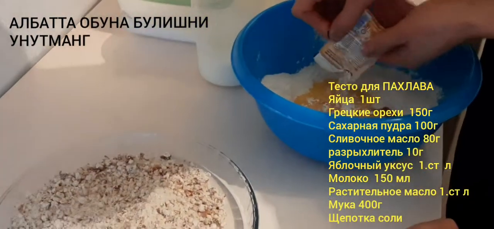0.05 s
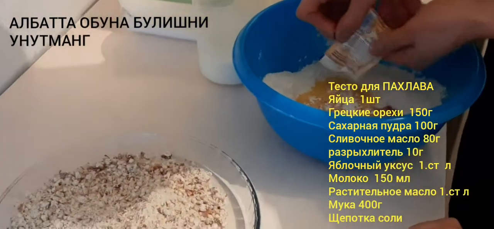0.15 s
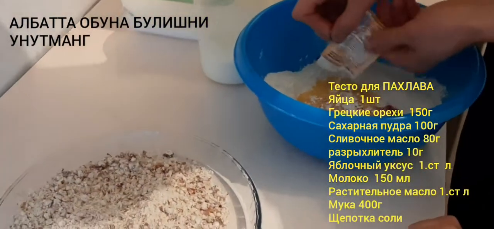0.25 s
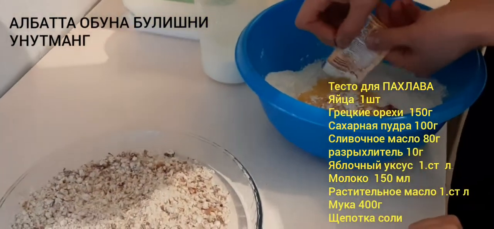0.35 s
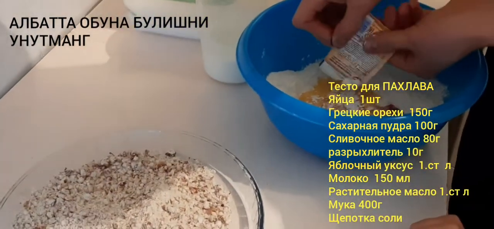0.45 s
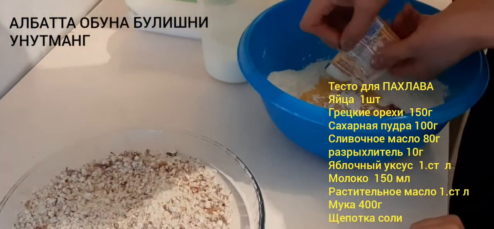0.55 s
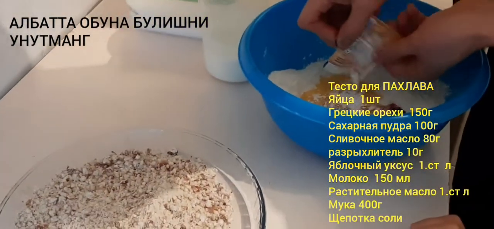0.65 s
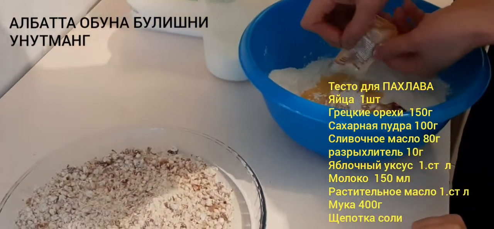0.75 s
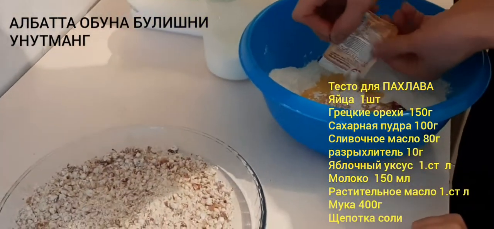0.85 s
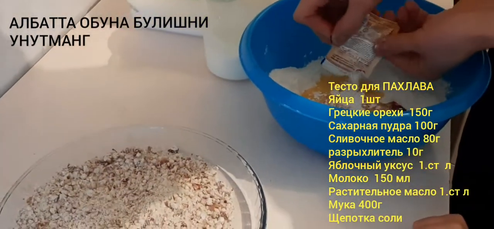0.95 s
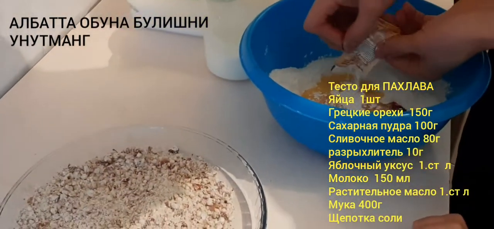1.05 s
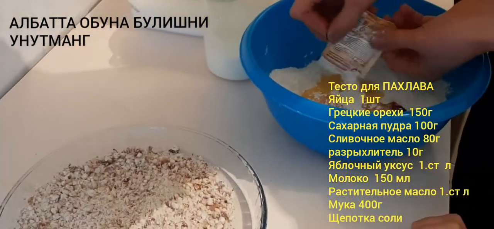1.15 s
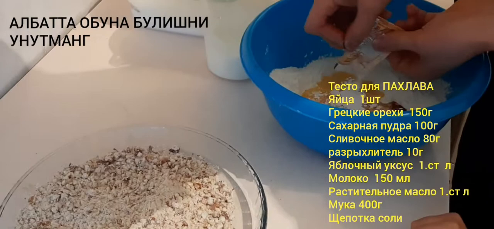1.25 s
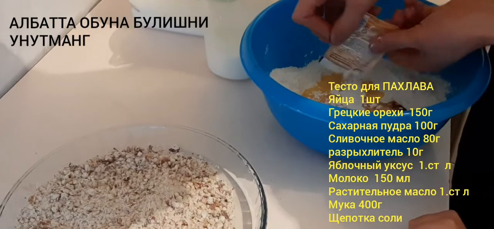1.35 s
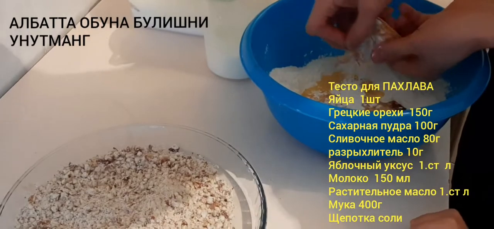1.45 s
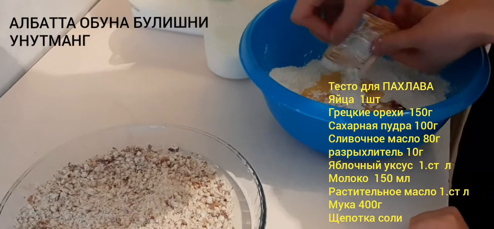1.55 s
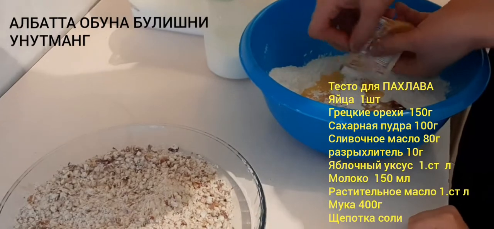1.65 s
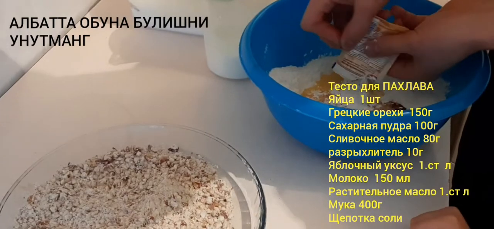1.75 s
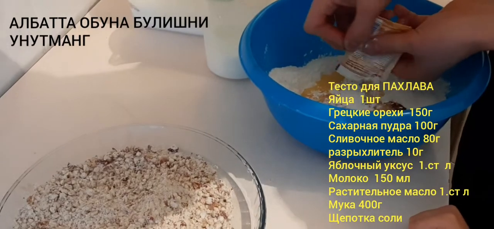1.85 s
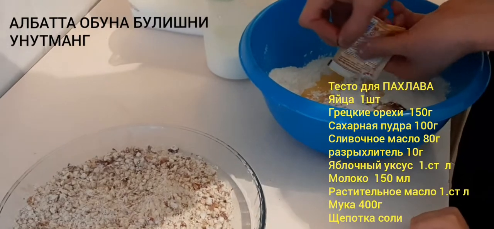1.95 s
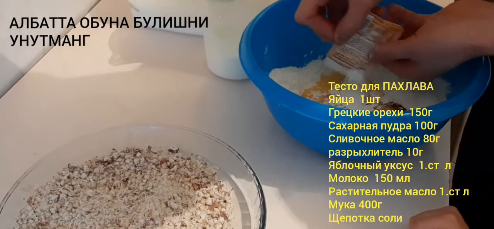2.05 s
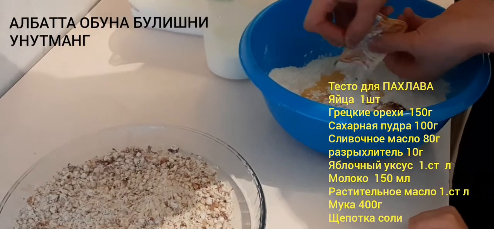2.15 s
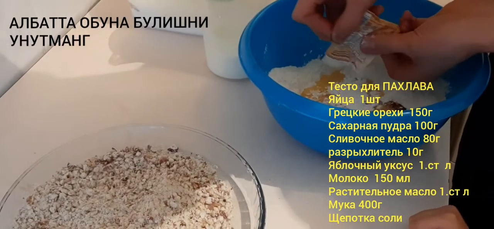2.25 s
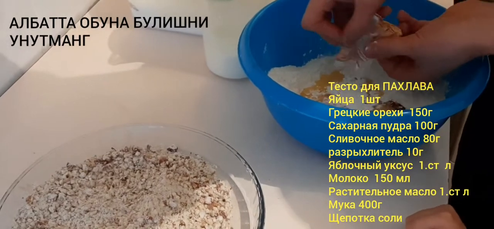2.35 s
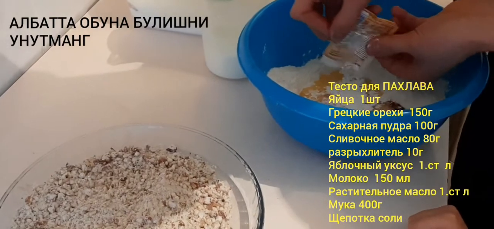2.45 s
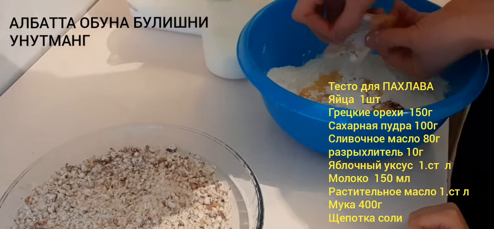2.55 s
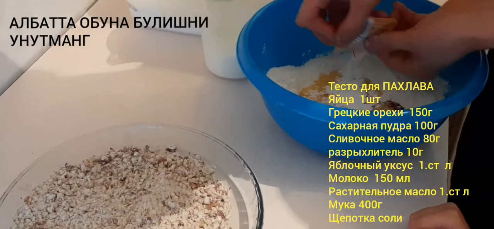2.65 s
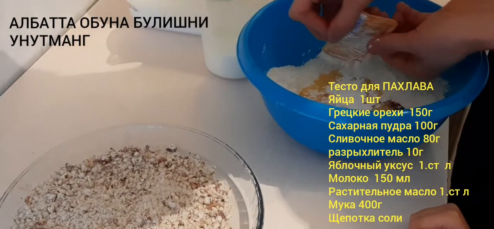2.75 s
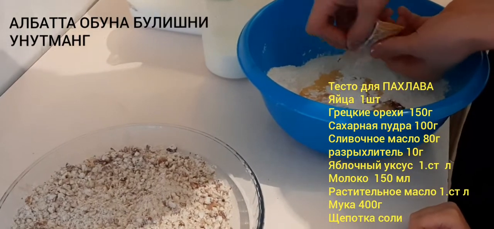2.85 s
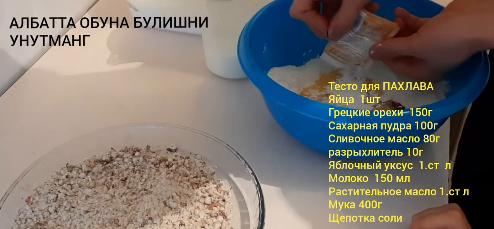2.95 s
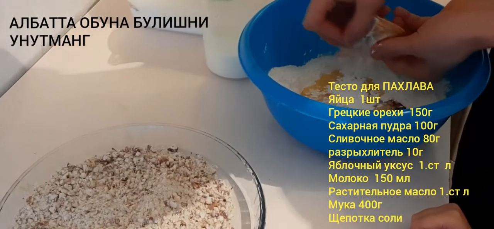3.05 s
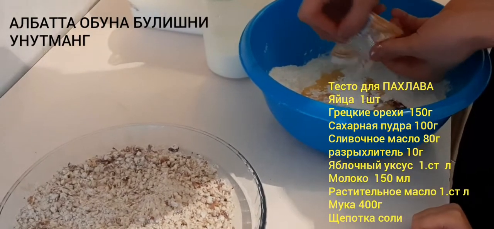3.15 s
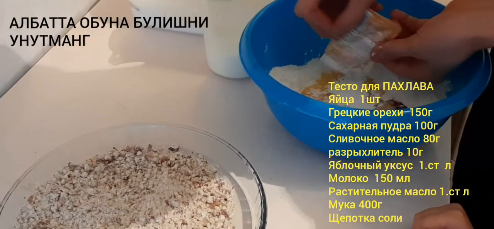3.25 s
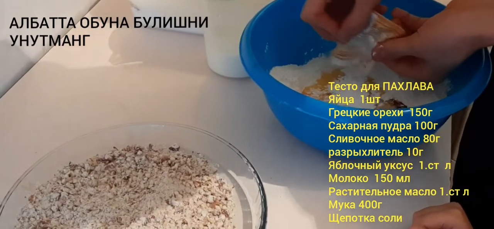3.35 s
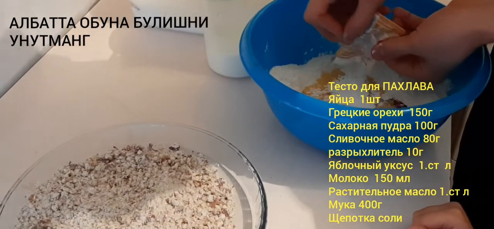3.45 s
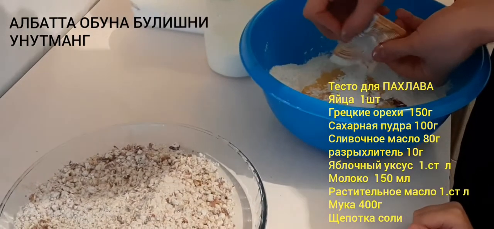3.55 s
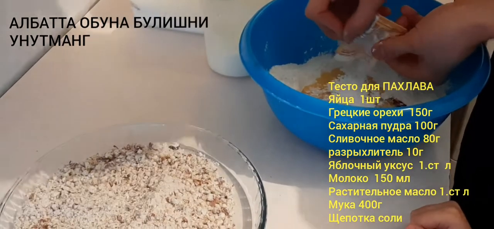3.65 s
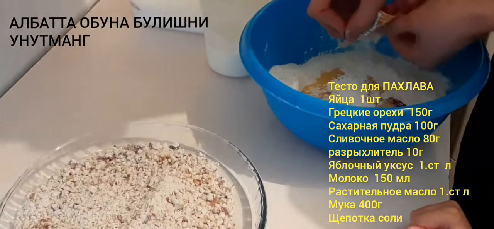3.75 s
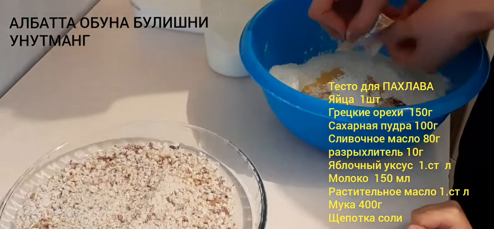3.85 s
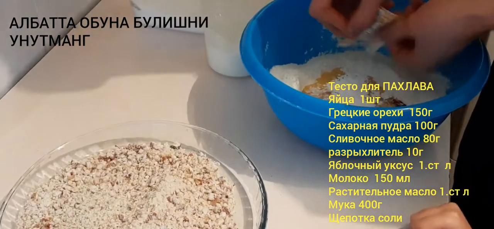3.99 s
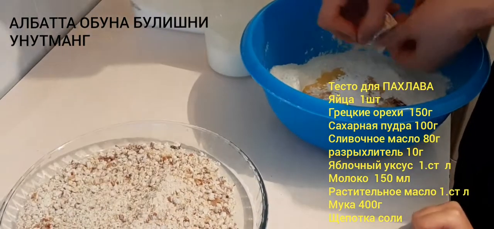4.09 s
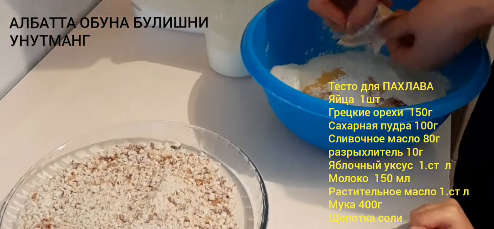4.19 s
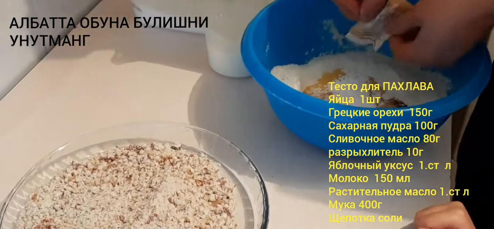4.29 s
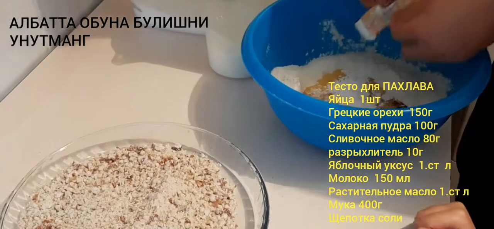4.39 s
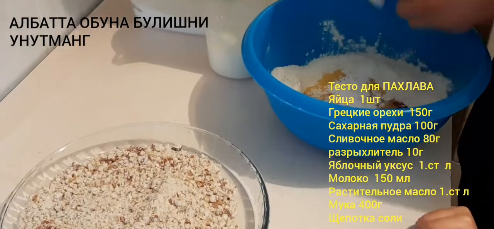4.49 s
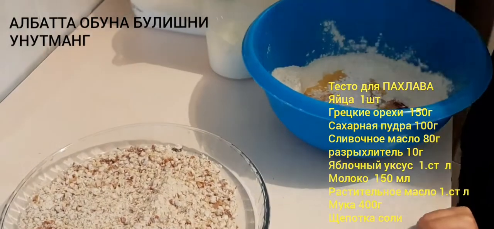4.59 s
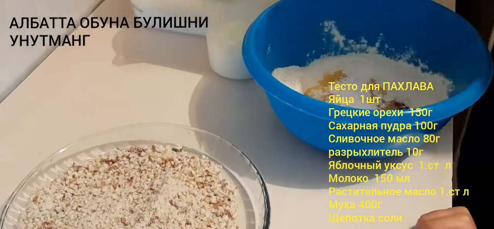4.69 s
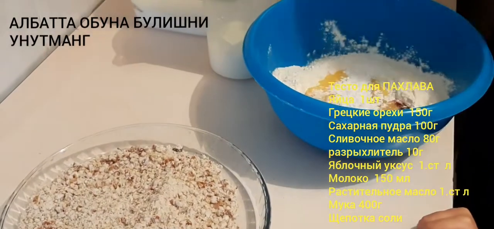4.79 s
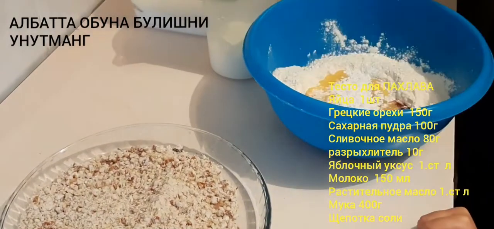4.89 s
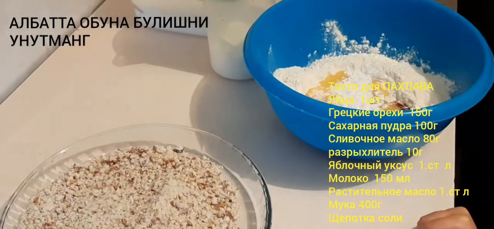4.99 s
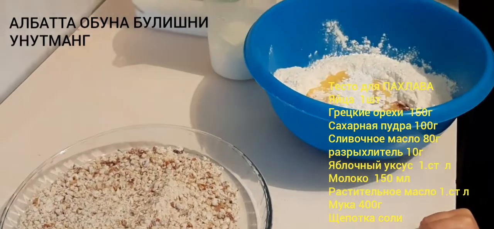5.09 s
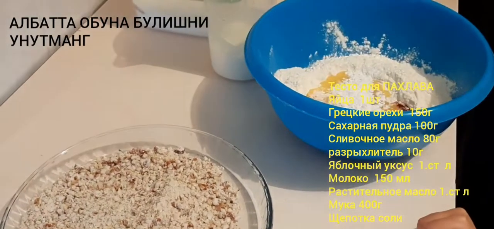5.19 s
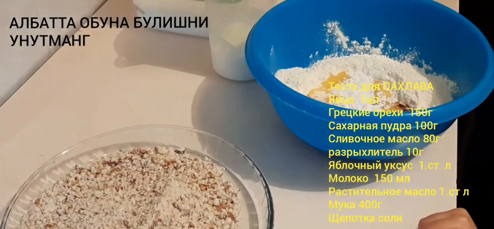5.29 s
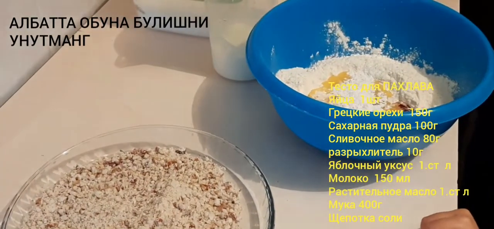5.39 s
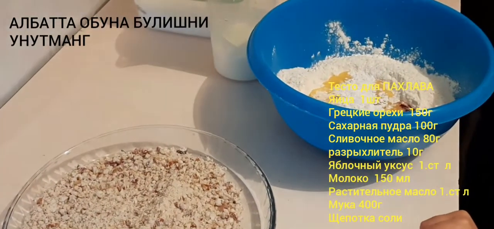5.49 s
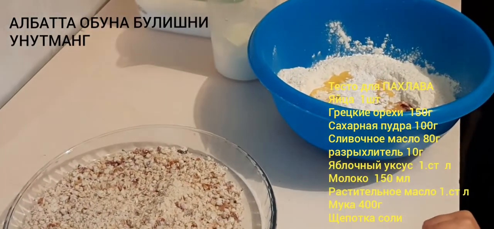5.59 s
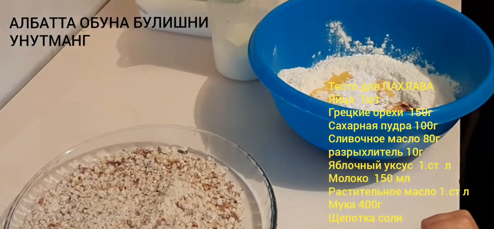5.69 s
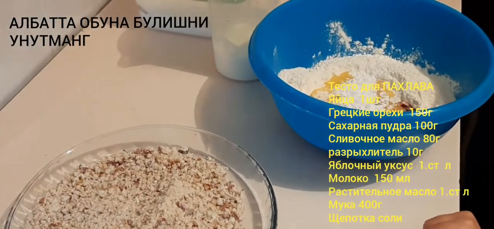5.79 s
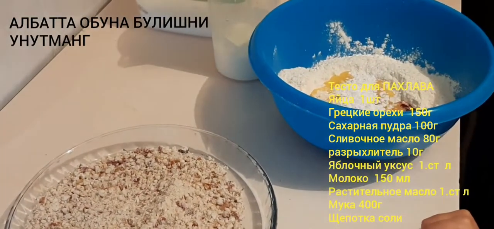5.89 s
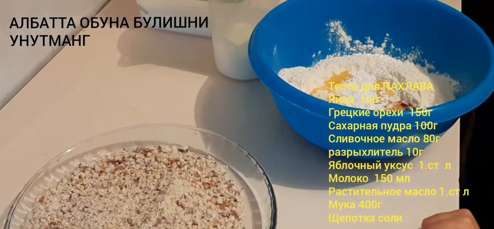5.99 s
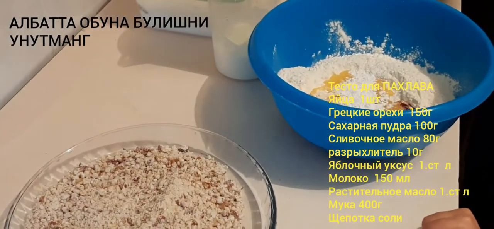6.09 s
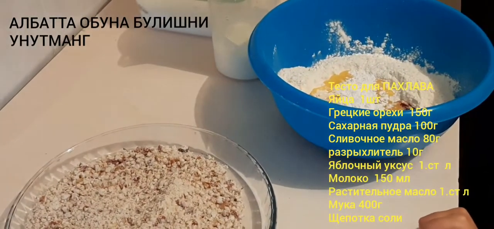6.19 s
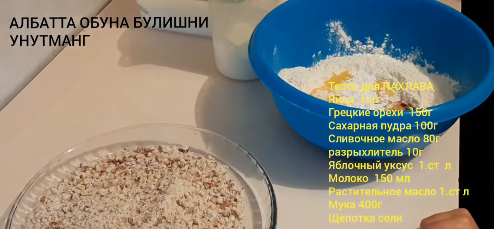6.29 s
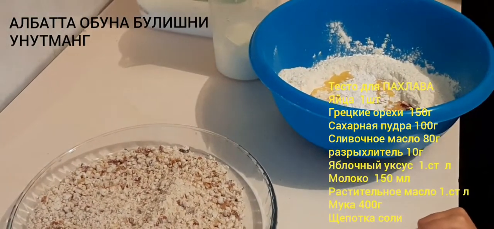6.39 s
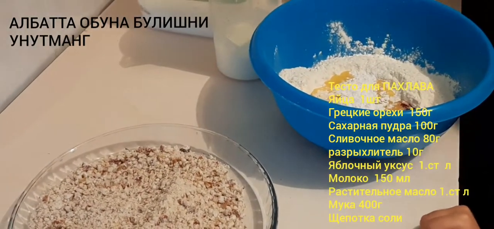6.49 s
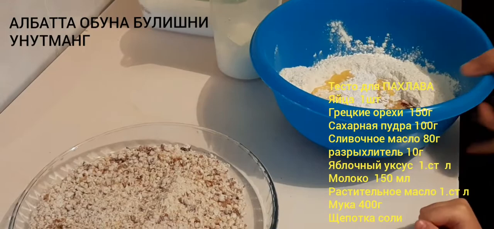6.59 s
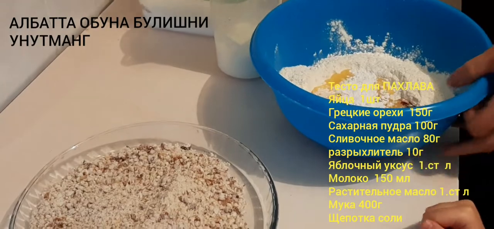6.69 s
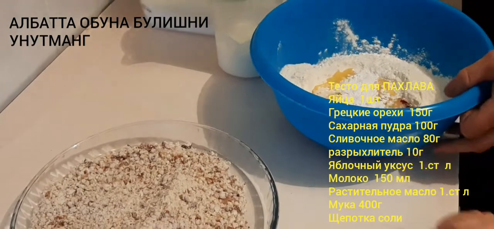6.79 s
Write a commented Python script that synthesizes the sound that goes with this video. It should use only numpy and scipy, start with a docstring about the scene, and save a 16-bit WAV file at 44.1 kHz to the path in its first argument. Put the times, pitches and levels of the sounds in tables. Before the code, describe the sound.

Crisp paper crackling builds over a bowl and thins out, followed by a soft bin-like knock, a drawer thudding closed and faint rubbing.

```python
"""At a kitchen worktop, close to a stereo microphone, a small paper sachet is crumpled and shaken empty
over a plastic mixing bowl. Creases snap as sharp clicks with dying runs of buckles, over a rustle of
random tiny clicks; resonances stand for the bowl, decaying noise for the reflections and the room.
Then it is put away: noise scuffs clatter as of a bin, blows ring a drawer's modes as it slides shut,
and filtered noise brushes the bowl. A wavering low rumble and room tone lie beneath."""
import sys
import numpy as np
from scipy import signal
from scipy.fft import rfft, irfft, next_fast_len
from scipy.io import wavfile
from scipy.ndimage import uniform_filter1d

SR = 44100
rng = np.random.default_rng(int(sys.argv[2]) if len(sys.argv) > 2 else 0)


def waveform_to_disk(signal):
    """Save audio, clipped to [-1, 1], as 16-bit WAV at the path in sys.argv[1]."""
    frames = np.transpose(np.atleast_2d(signal))
    scaled = np.clip(frames, -1, 1) * 32767
    samples = np.round(scaled).astype(np.int16)
    wavfile.write(sys.argv[1], SR, samples)


N = 301515
TIME = np.arange(N) / SR

# creases snapping, levels ahead of the trims in snaps(): start_s, crack_db (over 10 ms),
# flap_db (re crack), fizz_db (re crack), crease_hz, run_s (length of the run of buckles), click_db (re run)
SNAPS = [(.007, -36.5, -10.5, -1.5, 5800, 0.02, -9), (0.1508, -49, -25, -10, 4000, .002, 4),
         (0.1809, -44, -15, -9, 1800, .003, 9), (.1934, -41.5, -20, 0, 6700, .005, 0),
         (.361, -41, -27, -9, 4570, 0.0028, -1), (0.4224, -46, -25, -9, 3000, .005, -2),
         (0.441, -36.5, -31, -11, 4620, 0.0042, 2), (0.507, -35.5, -27, -2, 3400, 0.0016, 1),
         (0.5546, -38.5, -0.5, 3, 1800, 0.0048, -1), (.645, -41, -7.5, -1, 6500, 0.03, -14),
         (.671, -42, -18, -9, 1900, 0.0057, -1), (.685, -38, -12, 4, 7300, .005, -6),
         (.695, -38, -21, 1, 7200, .004, 0), (.764, -45.5, -18, -8, 4500, .002, 6),
         (0.8322, -42.5, -30, 2, 6800, 0.0037, 1), (.8548, -40.5, -18, -15, 2770, 0.0037, 0),
         (0.8816, -42, -28, -6, 6200, .006, 3), (0.8966, -45, -22, -1, 4600, .003, 2),
         (0.9378, -39.5, -15, 0, 5600, 0.0037, -3), (.9611, -39.5, -15, -7, 5530, .006, 8),
         (.986, -47, -18, -16, 4500, 0.0023, 0), (1.048, -42.5, -24, -11, 5400, .004, -1),
         (1.063, -50, -27, -16, 3500, .002, 2), (1.119, -44, -23, -2, 5030, .005, -7),
         (1.1289, -36, -12.5, -10, 5100, 0.0081, -3), (1.191, -45, -16, -8, 4500, .003, -1),
         (1.2186, -47.5, -19, 4, 2800, .006, -6), (1.2342, -37, -26, -8, 3800, 0.0069, 1),
         (1.316, -39, -24, -8, 4000, 0.0026, 8), (1.3605, -44, -28, -4, 2210, .002, 1),
         (1.3938, -40.5, -28, -5, 3300, .006, 1), (1.4171, -41.5, -28, -5, 3000, .005, 3),
         (1.430, -40, -20, 3.5, 1970, 0.0061, -1), (1.4994, -39.5, -22, -3, 4900, 0.0059, -2),
         (1.5084, -34, -3, -7, 3050, 0.0079, 7), (1.579, -42, -9, -5, 2400, 0.0054, 0),
         (1.6434, -36.5, -30, -12, 3850, 0.0045, 2), (1.653, -40, -23, 3.5, 4500, 0.0042, -4),
         (1.6779, -36, -15, -6, 7300, .013, -10), (1.7496, -37, -25, -1.5, 2250, 0.0033, 3),
         (1.7856, -38.5, -11, -3, 3700, .006, 0), (1.802, -42, -21, -8, 5500, 0.0045, 2),
         (1.8794, -41, -8, -6, 2190, 0.0031, 4), (1.9105, -46.5, -23, -14, 2220, .002, 7),
         (1.9295, -44, -15, 3, 4500, .003, 2), (1.9385, -38.5, -14, 4.5, 2310, .005, 4),
         (1.9504, -38, -14, 3, 3500, 0.0025, 3), (1.96, -34.5, 0, -12, 2870, 0.007, 1),
         (1.9787, -38, -3, -7, 2200, 0.0036, 3), (2.014, -35.5, -3, -4, 2000, 0.013, -12),
         (2.115, -29.5, -8.5, -5, 3360, 0.0053, 2), (2.1314, -34.5, -16, -12, 2520, 0.0088, -3),
         (2.1546, -39, -11, -12, 3000, .004, -2), (2.2183, -47.5, -17, -9, 4000, 0.004, 2),
         (2.2424, -52, -9, -10, 2200, 0.0018, 4), (2.262, -51, -15, -7, 4000, .002, 4),
         (2.2901, -42, -9, -9, 6570, .005, -1), (2.328, -38, -9, -11, 3300, .005, 0),
         (2.333, -31, -12, -11, 3300, 0.0036, 6), (2.3461, -26.5, -22, -7, 3200, .003, -1),
         (2.4093, -34.5, -26, -7, 1710, 0.0074, 0), (2.434, -31.5, -4, -4, 1780, .008, -5),
         (2.4515, -33.5, -5, 0.5, 5900, 0.0027, 1), (2.500, -38, -5, -8, 3500, .003, -2),
         (2.5145, -29.5, -7.5, -9, 3400, 0.004, -4), (2.522, -33, -4, -12, 2010, .005, 4),
         (2.568, -30, -17, -2.5, 4000, .004, 2), (2.601, -24.5, -14, -8, 3220, .012, -9),
         (2.615, -28.5, -16, -2, 4020, 0.0064, -4), (2.658, -34, -17, -12, 3520, .008, -10),
         (2.701, -33.5, -24, -10, 5100, .008, -4), (2.7162, -34, -14, -11, 3800, .004, 1),
         (2.7314, -36.5, -20, -12, 3800, .003, 6), (2.758, -31, -11, -8, 7400, 0.019, -6),
         (2.783, -30.5, -9.5, 0.5, 4800, .007, -4), (2.823, -28.5, -4.5, -12, 3700, 0.029, -13),
         (2.869, -29.5, -18, -2, 3450, 0.0072, 2), (2.881, -31, -15, -4, 5350, 0.0032, -1),
         (2.951, -34.5, -5.5, -2, 6000, 0.0055, -2), (2.966, -28, -5, -3.5, 1650, 0.0073, -1),
         (3.016, -30, -6.5, -6, 2900, 0.0083, -4), (3.031, -29.5, -21, -1, 4430, 0.015, -5),
         (3.0425, -26, -16, -6.5, 4930, .005, -4), (3.1204, -35.5, -8, 5, 7500, 0.0031, 1),
         (3.128, -27, -5, -4, 1960, 0.0063, -2), (3.180, -38.5, -0.5, -18, 1960, 0.005, -3),
         (3.193, -30, -20, -15, 4340, 0.0063, -8), (3.2016, -32, -16, 1, 4140, 0.0023, 1),
         (3.2626, -35.5, -10, 2.5, 5400, .005, -3), (3.271, -34, -3, -12, 2100, .0023, 2),
         (3.3232, -30.5, -11, -6, 2150, .009, 0), (3.338, -32, -10, -1.5, 2080, 0.0065, 2),
         (3.378, -41, -12, 3.5, 7200, .003, -3), (3.3905, -34.5, -6, -12, 4650, 0.0074, 1),
         (3.4389, -30.5, -9, -12, 3280, 0.0018, 1), (3.4543, -30, -19, -12, 6500, 0.0017, 8),
         (3.4699, -30.5, -14.5, -11, 4170, 0.0017, 5), (3.5507, -47, -2.5, -13, 1800, .0014, -2),
         (3.677, -44.5, -10, -2, 2500, 0.0025, -1), (3.6993, -34.5, -12, -2, 1650, 0.0071, 0.5),
         (3.7135, -32.5, -11, 0, 1800, .005, 3), (3.728, -27.5, -7.5, -8, 2150, .012, -15),
         (3.7399, -27.5, -9, -5, 4020, 0.017, -3), (3.780, -32, -7.5, -4, 1830, .0054, -1),
         (3.8242, -41, -15, -9, 4000, .003, 3), (3.877, -38.5, -1.5, -3, 1700, 0.018, -6),
         (3.898, -31.5, -4.5, -14, 4700, .0071, 0), (3.9158, -30.5, -13, -5, 3600, 0.0025, -1),
         (3.996, -30.5, -7.5, -3, 1800, .016, -8), (4.033, -41, -8, -9, 3480, 0.0027, 2),
         (4.0789, -27.5, -14, -5, 4250, 0.021, -14), (4.168, -47.5, -0.5, -16, 2100, .004, 1),
         (4.2573, -49, -12, -7, 2130, 0.0044, 3), (4.295, -54.5, 3, -10, 1700, 0.041, -19),
         (4.4214, -48, -10, -13, 3500, .005, 5), (4.4345, -39, -16, -11, 4050, .004, 1),
         (4.458, -41, -11.5, -7, 4900, .005, -1), (4.4928, -32, -22, -2.5, 2100, 0.0028, -10),
         (4.621, -52.5, -13, -10, 4300, .015, -10), (4.655, -52, -9, -11, 3000, .012, 0)]
# spells in which the fingers work the paper: start_s, end_s, rustle_db
SQUEEZES = [(0, 0.027, -58), (0.13, 0.223, -52), (0.363, 0.765, -57.5), (.84, 1.02, -59),
            (1.082, 1.59, -55.5), (1.55, 2.04, -51.5), (2.11, 2.267, -56.5), (2.362, 2.456, -44.5),
            (2.51, 3.048, -44), (3.212, 3.455, -45.5), (3.623, 3.7, -54), (3.7, 3.815, -46),
            (3.862, 4.11, -44.5), (4.234, 4.332, -60.5), (4.4, 4.535, -53.5), (4.582, 4.677, -58)]


def sachet(block=4096, handling_ends_s=4.9):
    """The paper sounds through the bowl's resonances; it keeps moving, so each block has new reflections."""
    # resonances of the bowl under the sachet: centre_hz, width_hz, gain_db
    bowl = [(566, 83, 3), (775, 260, -6.5), (997, 197, 6), (1345, 110, -2.5), (1540, 175, 7),
            (1812, 78, -12), (2129, 51, 7.5), (2219, 32, 4), (2620, 28, 3.5), (2950, 39, 0.5),
            (3700, 140, 2), (4240, 370, 2)]
    # stereo balance of the paper: frequency_hz, left_minus_right_db
    balance = [(300, -1.5), (1000, -1.5), (2200, 0), (4500, -1.6), (8000, -0.5), (14000, 2.6)]
    x = snaps(SNAPS) + rustle() + flicks() + snaps(ticks())
    for hz, width_hz, db in bowl:
        x = x + (from_db(db) - 1) * resonate(x, hz, width_hz)
    heard = np.zeros((2, next_fast_len(N)))
    for start in range(0, int(handling_ends_s * SR), block):
        moment = kitchen(x[start:start + block], near_db=6.5, near_t60=0.023, tail_db=4.0,
                         lag=4.05, direct_pan_db=-7.5)
        heard[:, start:start + moment.shape[1]] += moment
    size = heard.shape[1]
    pan_db = at_hz(balance, np.fft.rfftfreq(size, 1 / SR))
    return irfft(rfft(heard) * from_db(pan_db * [[.5], [-.5]]), size)[:, :N]


def snaps(rows, first_db=0.0, level_db=0.5, flap_trim_db=-3.0, fizz_trim_db=0.0, per_s=1300):
    """A crease strains, gives way with one sharp click and sets off a dying run of smaller buckles."""
    shortest_lead_s, lead_share = 0.00076, 0.33   # buckles swell up ahead of the click; share of the run
    before = 600   # samples kept for that swell
    out, t = np.zeros(N + before), TIME[:4096] - TIME[before]
    over_10_ms = np.sqrt(.01 * SR / len(t))   # makes the level an rms over 10 ms
    for s, crack_db, flap_db, fizz_db, crease_hz, length, click_db in rows:
        length = max(length, .001)
        lead = shortest_lead_s + lead_share * length
        shape = np.exp(-np.abs(t) / np.where(t < 0, lead, length))
        buckles = (rng.random(len(t)) < per_s / SR) * rng.standard_normal(len(t))
        clicks = unit_energy(buckles * shape)
        clicks[before] += from_db(first_db + click_db)
        snap = paper(evened(clicks, size=71), crease_hz, flap_db + flap_trim_db, fizz_db + fizz_trim_db)
        start = max(round(s * SR), 0)
        out[start:start + len(t)] += over_10_ms * from_db(crack_db + level_db) * snap
    return out[before:]


def ticks(count=200, per_s=28, tick_db=1, spread_db=4.5, low_hz=1800, high_hz=6500):
    """Small creases give way at random, as strong as the effort; rows have the columns of SNAPS."""
    flap_db, fizz_db, run_s, click_db = -17, -7.5, 0.0025, 9
    draws, gain = rng.random((count, 3)), effort()
    times = np.cumsum(-np.log(1 - draws[:, 0])) / per_s
    levels = tick_db + spread_db * (2 * draws[:, 1] - 1)
    pitches = low_hz * (high_hz / low_hz) ** draws[:, 2]
    last_s = SQUEEZES[-1][0]
    rows = []
    for s, db, hz in zip(times, levels, pitches):
        if s < last_s:
            effort_db = 20 * np.log10(gain[int(s * SR)] + 1e-9)
            rows.append((s, db + effort_db, flap_db, fizz_db, hz, run_s, click_db))
    return rows


def rustle(per_s=1400, spread_db=7.5, clump_db=4.0, level_db=0.0, flap_db=-8.5, fizz_db=-4.0):
    """Tiny buckles of uneven size come in clumps as fingers work the paper and as it settles after a snap."""
    settle_db, settle_s = -21, 0.012   # level re the snap's crack, fading time
    settling = sum(from_db(db + settle_db) * swell(s, length, 0, settle_s)
                   for s, db, *_, length, click_db in SNAPS)
    sizes = from_db(spread_db * np.minimum(rng.exponential(1, N), 4)) * rng.choice([-1, 1], N)
    clicks = (rng.random(N) < per_s / SR) * sizes * from_db(clump_db * drift(70))
    gain = from_db(level_db) * effort() + settling
    return gain * paper(clicks, 2300, flap_db, fizz_db, ring_gain=0.079)


def flicks(level_db=3.0, low_hz=290, high_hz=620):
    """A flick or shake moves the whole sachet: a short, dull puff of fading noise."""
    # fingers flicking and shaking the sachet, ahead of level_db: start_s, level_db, fade_s
    flick_rows = [(0.555, -55, 0.012), (2.785, -48, 0.01), (2.952, -44, 0.016), (3.014, -47.5, 0.012),
                  (3.127, -47, .008), (3.391, -49.5, 0.011), (3.730, -48.5, 0.021), (3.781, -50, 0.0078),
                  (3.880, -45, 0.0087), (3.992, -48, 0.012), (4.085, -48, 0.011), (4.168, -64, 0.011)]
    out, t = np.zeros(N), TIME[:4096]
    for s, db, fade_s in flick_rows:
        puff = rms_one(band(rng.standard_normal(len(t)), low_hz, high_hz, order=3)) * np.exp(-t / fade_s)
        start = round(s * SR)
        out[start:start + len(t)] += from_db(db + level_db) * puff
    return out


def effort(rise_s=0.015, fade_s=0.05):
    """Gain of the fingers' work on the paper: each squeeze rises, holds and lets go; the strongest counts."""
    return np.max([from_db(db) * swell(start, rise_s, end - start - rise_s, fade_s)
                   for start, end, db in SQUEEZES], axis=0)


def paper(clicks, crease_hz, flap_db, fizz_db, ring_gain=1.0, ring_width=0.48, thump_db=-18.0):
    """A buckle rings its crease, flaps the sheet below it (with the fingers' dull thump), fizzes above it."""
    crack = band(clicks, 2150, 9080) + ring_gain * resonate(clicks, crease_hz, ring_width * crease_hz)
    flap = band(clicks, 570, 1526, order=3) + from_db(thump_db) * band(clicks, 84, 296)
    fizz = band(clicks, 7750, 15520, order=2)
    return rms_one(crack) + from_db(flap_db) * rms_one(flap) + from_db(fizz_db) * rms_one(fizz)


def bin_clatter(level_db=-3.0, scuff_s=0.0064, top_hz=1400):
    """A light thing lands and bounces in a thin-walled bin; each soft contact scuffs the walls for moments."""
    # light contacts on the bin, ahead of level_db: start_s, level_db
    contacts = [(5.110, -35.5), (5.114, -32), (5.128, -35.5), (5.145, -36.5), (5.162, -36.5), (5.176, -41),
                (5.2, -42), (5.22, -44.5)]
    # the bin's well-damped wall resonances: centre_hz, width_hz, level_db (re one another)
    wall_modes = [(469, 35, -8.5), (643, 43, -10), (712, 48, 3), (950, 97, -2), (1040, 75, 0),
                  (1167, 59, 9.5), (1250, 50, -4), (1520, 90, -16), (1910, 60, -8), (2410, 50, -11)]
    walls, t = np.zeros(N), TIME[:4096]
    for s, db in contacts:
        noise = rng.standard_normal(len(t)) * np.exp(-t / scuff_s)
        scuff = band(evened(noise, size=21), 290, top_hz)
        knock = sum(from_db(mode_db) * unit_energy(resonate(scuff, hz, width_hz))
                    for hz, width_hz, mode_db in wall_modes)
        start = round(s * SR)
        walls[start:start + len(t)] += from_db(db + level_db) * np.sqrt(scuff_s * SR) * unit_energy(knock)
    return kitchen(walls, near_db=1.5, near_t60=0.013, tail_db=-2.5, lag=-2)


def drawer(clap_db=9.0, rattle_db=-25.0, rattle_s=0.0074):
    """Soft bumps reach only the low modes, the hard clap the high ones; each rattles a little over runners."""
    # bumps along the runners, the thud home, the front's clap, ahead of a 0.5 dB cut:
    # start_s, level_db, lowest_hz and highest_hz of the blow
    hits = [(5.616, -60, 40, 400), (5.753, -56, 40, 161), (5.851, -62, 38.5, 235.4),
            (6.09, -45.5, 150, 690), (6.125, -49.5, 60, 419), (6.149, -36, 80.5, 345),
            (6.165, -43, 50, 222), (6.262, -37.5, 480, 1920), (6.268, -42.5, 480, 1800),
            (6.335, -52.5, 130, 1150)]
    # the drawer's modes: pitch_hz, level_db (re the blow), t60_s
    modes = [(68, -11, 0.46), (104.7, -1, 0.27), (187.7, -3, .33), (212, -7, .3), (257, -3, .22),
             (294, -12, 0.32), (399, -3.5, .041), (476, -1, 0.06), (607, -1, 0.069), (720, 0.5, .1),
             (870, -8, .058), (931, 0.5, 0.098), (1080, 0.5, 0.051), (1342, -2.5, 0.049), (1508, -4, 0.083),
             (1610, -5, .078), (2030, -14, .11)]
    blows, t = np.zeros(N), TIME[:4096]
    for s, db, low_hz, high_hz in hits:
        rattle = from_db(rattle_db) * rng.standard_normal(len(t)) * np.exp(-t / rattle_s)
        contact = signal.unit_impulse(len(t)) + rattle
        start = round(s * SR)
        blows[start:start + len(t)] += from_db(db - 0.5) * band(contact, low_hz, high_hz)
    wood = ring(blows, modes) + from_db(clap_db) * blows + runners()
    return kitchen(wood, near_db=0.5, near_t60=0.013, tail_db=-1.0, lag=-1.5)


def runners():
    """Friction makes the runners sing; their upper note gives way to lower ones as the drawer travels."""
    # level of the runners' friction along the slide: time_s, level_db
    slide = [(5.53, -67.5), (5.63, -53.5), (5.75, -51.5), (5.88, -55), (6.0, -56), (6.15, -58.5),
             (6.3, -51)]
    # the runners' resonances, each passed twice:
    # centre_hz, width_hz (of one pass), early_db as the drawer sets off, late_db as it arrives
    notes = [(111, 52, -13, -17), (216, 75, -16, -0.5), (480, 180, -18, -5.5), (736, 134, -7.5, -2.5),
             (823, 90, -9, -8), (942, 76, 3, -9), (1517, 160, -13.5, -9.5), (2066, 64, -13, -8)]
    start, end = slide[0][0], slide[-1][0]
    travel = np.clip((TIME - start) / (end - start), 0, 1)
    friction = rng.standard_normal(N)
    song = 0
    for hz, width_hz, early_db, late_db in notes:
        note = resonate(resonate(friction, hz, width_hz), hz, width_hz)
        song = song + from_db(early_db + (late_db - early_db) * travel) * note
    sliding = (TIME > start) * (TIME < end)
    return sliding * from_db(in_time(slide)[0]) * song / np.std(song[sliding])


def brushing(rub_db=4.5, hiss_db=4.5, grain_db=1.0, rub_top_hz=2700, hiss_low_hz=3900,
             focus_gain=0.61, focus_width=0.36):
    """Grainy friction of cloth and skin: a firm rub is dull, a light graze only hisses, at its own pitch."""
    # strokes of sleeve, hand and drawer over surfaces, ahead of rub_db and hiss_db:
    # start_s, rise_s, fade_s, rub_db, bright_db (hiss re rub), hiss_centre_hz
    strokes = [(4.96, 0.053, 0.14, -56, -3, 4200), (5.055, 0.0039, .035, -64, 10, 7100),
               (5.103, .034, 0.076, -54.5, 4.5, 4800), (5.325, 0.016, 0.085, -66.5, 5, 4900),
               (5.44, .022, 0.1, -68, -3, 7500), (5.57, 0.14, 0.39, -59, 3, 4200),
               (6.25, 0.013, 0.055, -58.5, -3.5, 3820), (6.652, 0.017, .3, -60, 0.5, 7350),
               (6.779, .016, 0.056, -55.5, 0, 4170)]
    # colour of the brushing: frequency_hz, density_db (per Hz, relative)
    colour = [(120, -33), (200, -16), (482, -13.5), (1140, -8), (1400, -7), (2050, -1.5), (3430, -3.5),
              (7010, -11), (7680, -9.5), (8420, -13.5), (11700, -10), (16000, -12)]
    longest_s = 1   # by about this time any stroke has come to rest
    rub = rms_one(band(stereo_noise(colour), 104, rub_top_hz, order=2))
    hiss = band(stereo_noise(colour), hiss_low_hz, 15700, order=3)
    rubbing, hissing = 0, 0
    for start, rise, fade, db, bright_db, hz in strokes:
        stopping = np.exp(-(np.maximum(TIME - start, 0) / longest_s) ** 8)
        stroke = from_db(db) * swell(start, rise, 0, fade) * stopping
        rubbing = np.maximum(rubbing, stroke)
        focused = rms_one(hiss + focus_gain * resonate(hiss, hz, focus_width * hz))
        hissing = hissing + from_db(bright_db) * stroke * focused
    grain = from_db(grain_db * drift(200))
    return grain * (from_db(rub_db) * rubbing * rub + from_db(hiss_db) * hissing)


def background(rumble_db=2.0, waver_db=1.0, floor_db=-60.9):
    """Room tone and microphone hiss, one coloured noise, under a wavering rumble that comes and goes."""
    # spells of low rumble, ahead of rumble_db: start_s, rise_s, hold_s, fade_s, level_db
    spells = [(0, 0.14, 0.55, .08, -61), (.78, 0.063, 0.34, .11, -62), (2.426, 0.062, 0.055, 0.086, -59),
              (2.7, .1, .4, 0.58, -77.5), (6.62, 0.056, 0.18, .1, -71)]
    # colour of the rumble: frequency_hz, density_db (per Hz, relative)
    rumble_colour = [(25, -29), (42, -17), (57, 10), (72, -6.5), (110, -12.5), (170, -16.5), (300, -28)]
    # colour of the room tone and microphone hiss: frequency_hz, density_db (per Hz, relative)
    floor_colour = [(30, -21), (48, -10), (110, -9.5), (145, -9.5), (230, -15.5), (400, -20.5),
                    (650, -17.5), (1100, -15.5), (1950, -11.5), (3100, -20), (5000, -13), (7700, -13.5),
                    (12000, -15.5), (16000, -20)]
    gain = sum(from_db(db) * swell(start, rise, hold, fade) for start, rise, hold, fade, db in spells)
    rumble = gain * from_db(rumble_db + waver_db * drift(8.2)) * stereo_noise(rumble_colour)
    return rumble + from_db(floor_db) * stereo_noise(floor_colour)


def kitchen(x, near_db, near_t60, tail_db, lag, direct_pan_db=0):
    """Direct sound (lag samples later on the left), a quick scatter off near surfaces, and the room's tail.

    Each side's response has an energy of 1, so direct_pan_db sets how direct, not how loud, a side is.
    """
    # decay of the room: frequency_hz, t60_s
    room_t60 = [(150, 0.36), (800, 0.39), (2000, 0.35), (5500, 0.24), (14000, 0.19)]
    # colour of the room's tail: frequency_hz, level_db (relative)
    tail_colour = [(60, 1.5), (200, -4), (450, -2), (800, -1.5), (2000, -1.5), (5500, 1), (14000, 0.5)]
    t = TIME[:12288]
    direct = np.sinc(np.arange(len(t)) - 8 - np.array([[lag], [0]]))   # sinc: fractions of a sample
    direct = direct * from_db(direct_pan_db * np.array([[.5], [-.5]]))
    scatter = stereo_noise([(200, -20), (600, 0), (20000, 0)], size=len(t))
    near = unit_energy(scatter * from_db(-60 * t / near_t60))
    noise, hz = rfft(stereo_noise(tail_colour, size=len(t))), np.fft.rfftfreq(len(t), 1 / SR)
    octave = np.round(np.log2(np.clip(hz, 500, 16000)))
    tail = 0
    for k in np.unique(octave):   # each octave dies away at its own pace
        decay = np.exp(-np.log(1000) * t / at_hz(room_t60, 2 ** k))
        tail = tail + irfft(noise * (octave == k), len(t)) * decay
    tail = unit_energy(tail * (1 - np.exp(-t / 0.0025)))   # the tail builds up over 2.5 ms
    response = evened(direct + from_db(near_db) * near + from_db(tail_db) * tail, size=91)
    return signal.fftconvolve(x[None], response, axes=1)[:, :N]


def stereo_noise(colour, size=N):
    """Coloured noise, largely alike on both sides in the bass and nearly unrelated in the treble."""
    # likeness of the two sides: frequency_hz, correlation (0 to 1)
    likeness = [(60, 0.86), (125, 0.92), (250, 0.53), (500, 0.71), (1000, 0.039), (2000, 0), (16000, 0.064)]
    padded = next_fast_len(size)
    hz = np.fft.rfftfreq(padded, 1 / SR)
    mid, side = rfft(rng.standard_normal((2, padded)))
    alike = np.clip(at_hz(likeness, hz), -1, 1)
    both = np.sqrt(1 + alike) * mid + np.sqrt(1 - alike) * side * [[1], [-1]]
    return rms_one(irfft(both * from_db(at_hz(colour, hz)))[:, :size])


def ring(x, modes):
    """Each click sets all the modes ringing, with alternating signs."""
    out = 0
    for k, (hz, db, t60) in enumerate(modes):
        r, w = np.exp(-np.log(1000) / (t60 * SR)), 2 * np.pi * hz / SR
        mode = signal.lfilter([np.sin(w), -np.sin(w)], [1, -2 * r * np.cos(w), r * r], x + 1e-18) / w
        out = out + (-1) ** k * from_db(db) * mode
    return out


def resonate(x, hz, width_hz):
    """A two-pole resonance with a gain of about 1 on top."""
    r = np.exp(-np.pi * abs(width_hz) / SR)
    numerator = np.array([1, 0, -1]) * (1 - r * r) / 2
    return signal.lfilter(numerator, [1, -2 * r * np.cos(2 * np.pi * hz / SR), r * r], x + 1e-18)


def band(x, low_hz, high_hz, order=2):
    """Butterworth band-pass."""
    edges = [low_hz, np.clip(high_hz, low_hz * 1.1, .45 * SR)]
    return signal.sosfilt(signal.butter(order, edges, "band", fs=SR, output="sos"), x + 1e-18)


def evened(x, size=41):
    """Level out the broad chance humps in a short sound's spectrum, with nothing sounding early; energy 1."""
    n, spectrum = x.shape[-1], rfft(x)
    power = uniform_filter1d(np.abs(spectrum) ** 2, size, axis=-1)
    cepstrum = irfft(-.5 * np.log(np.maximum(power, 1e-20)), n)
    correction = np.exp(rfft(2 * cepstrum[..., :n // 2], n))   # the first half alone: minimum phase
    return unit_energy(irfft(spectrum * correction, n))


def swell(start, rise, hold, fade):
    """An envelope that rises in a straight line, holds and dies away exponentially."""
    t = TIME - start
    return np.clip(t / rise, 0, 1) * np.exp(-np.maximum(t - rise - hold, 0) / fade)


def drift(rate):
    """Slow chance with a spread of 1: random knots, rate per second, joined by straight lines."""
    knots = rng.standard_normal(4096)
    return rms_one(np.interp(TIME * rate, np.arange(len(knots)), knots))


def in_time(rows):
    """One curve per column, joined by straight lines."""
    s, *columns = np.transpose(rows)
    return [np.interp(TIME, s, c) for c in columns]


def at_hz(points, hz):
    """Read a table on a log-frequency axis."""
    f, value = np.transpose(points)
    return np.interp(np.log(np.maximum(hz, 1)), np.log(f), value)


def from_db(db):
    """Decibels to gain."""
    return 10 ** (np.asarray(db) / 20)


def rms_one(x):
    """Scale to an rms of 1."""
    return x / np.sqrt(np.mean(x ** 2) + 1e-20)


def unit_energy(x):
    """Scale each channel to an energy of 1."""
    return x / np.sqrt(np.sum(x ** 2, axis=-1, keepdims=True) + 1e-20)


def scene():
    """Everything heard at the worktop."""
    return sachet() + bin_clatter() + drawer() + brushing() + background()


def record(dry, cutoff_hz=15750):
    """The microphone ports lift one band in the treble and hollow out the next; the top is cut."""
    coloured = dry - 0.59 * resonate(dry, 8860, 1630)
    coloured = coloured + 0.46 * resonate(coloured, 7800, 600)
    return signal.sosfilt(signal.ellip(10, .1, 70, cutoff_hz, fs=SR, output="sos"), coloured)


dry = scene()
out = record(dry)
waveform_to_disk(out)
```